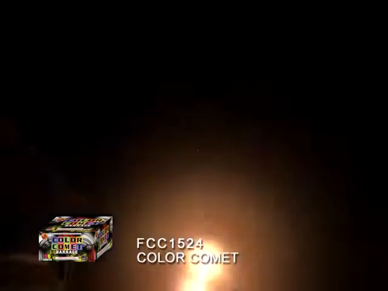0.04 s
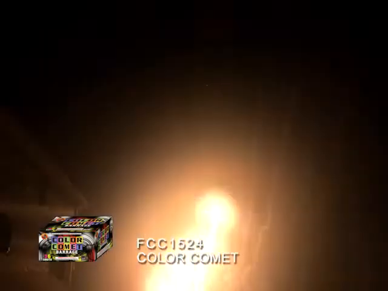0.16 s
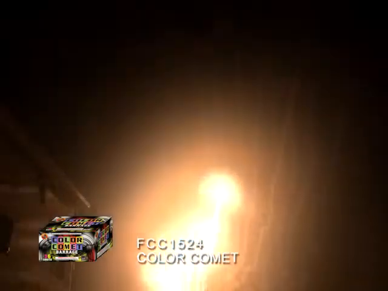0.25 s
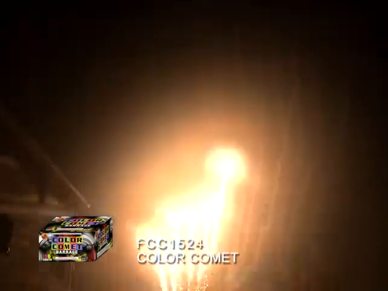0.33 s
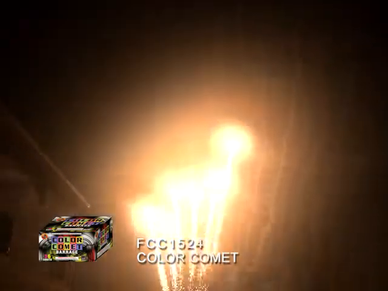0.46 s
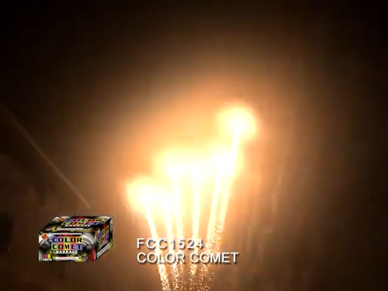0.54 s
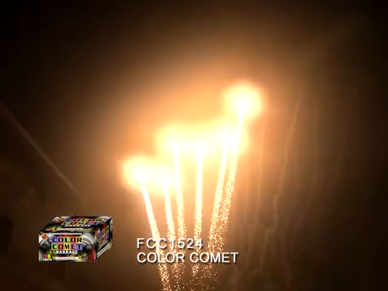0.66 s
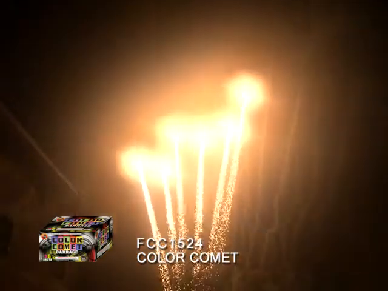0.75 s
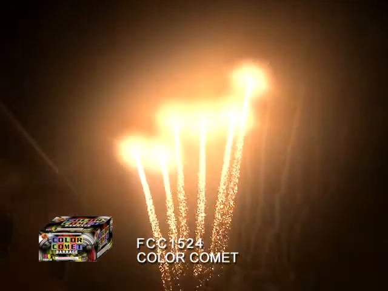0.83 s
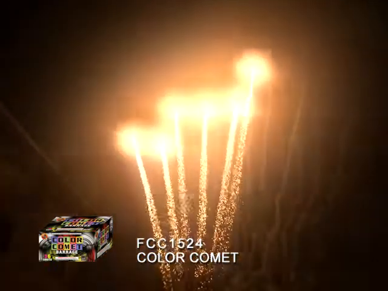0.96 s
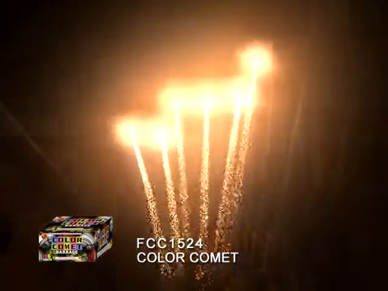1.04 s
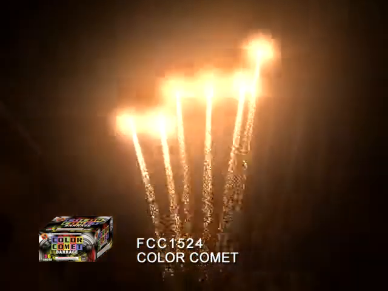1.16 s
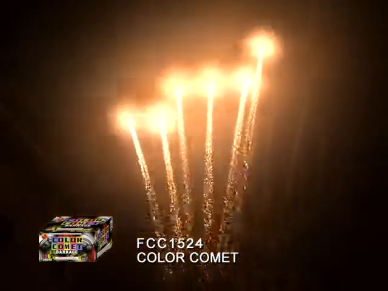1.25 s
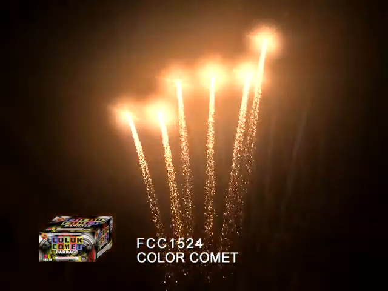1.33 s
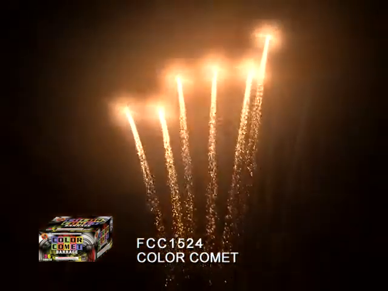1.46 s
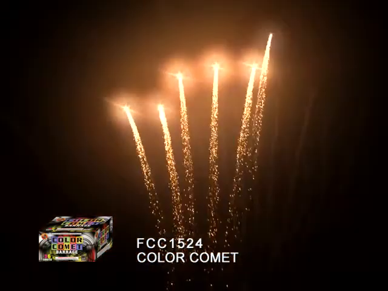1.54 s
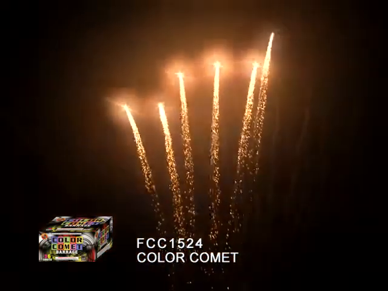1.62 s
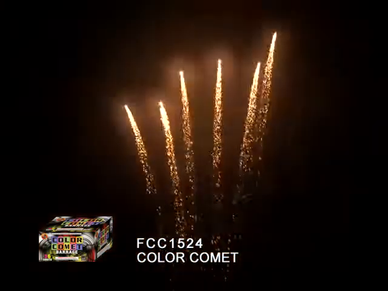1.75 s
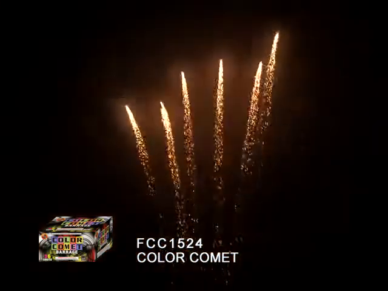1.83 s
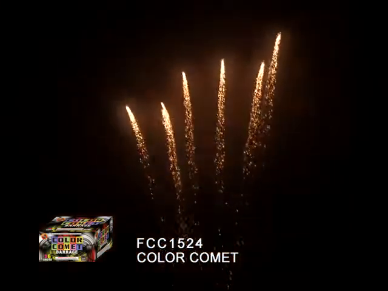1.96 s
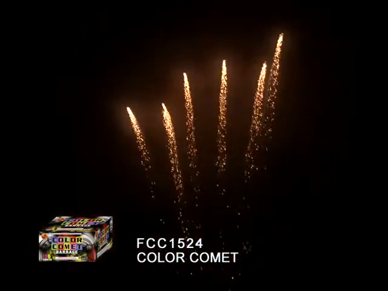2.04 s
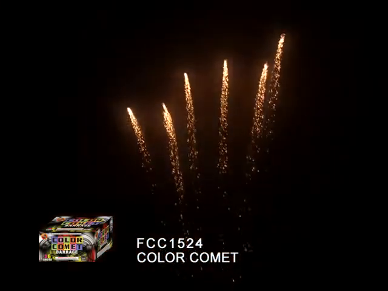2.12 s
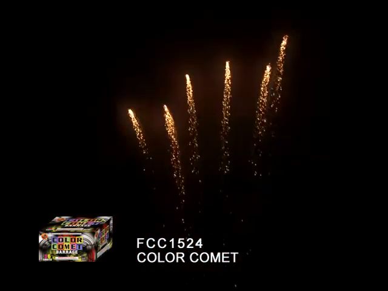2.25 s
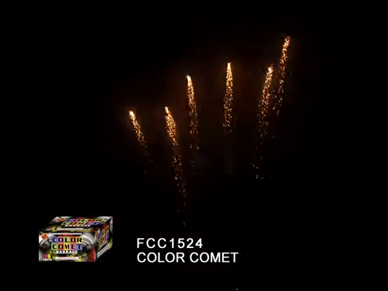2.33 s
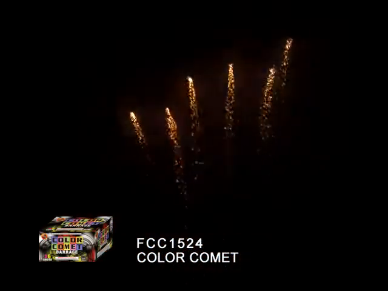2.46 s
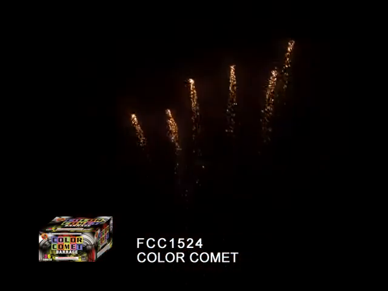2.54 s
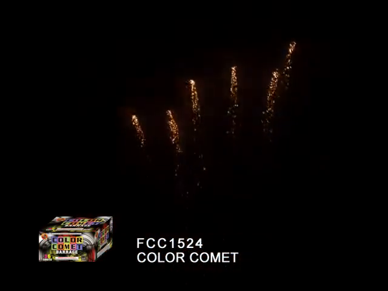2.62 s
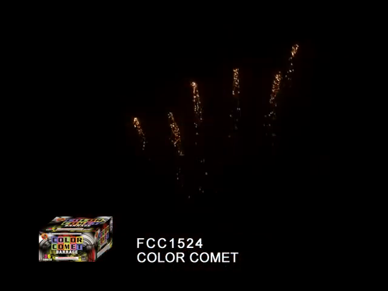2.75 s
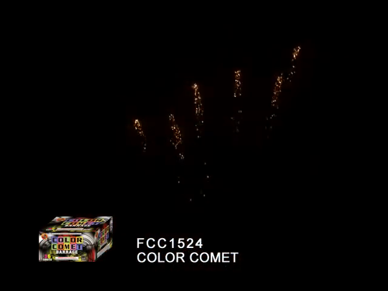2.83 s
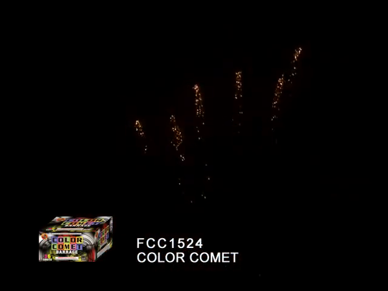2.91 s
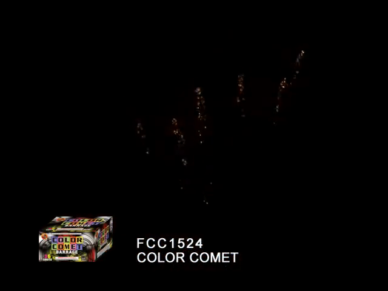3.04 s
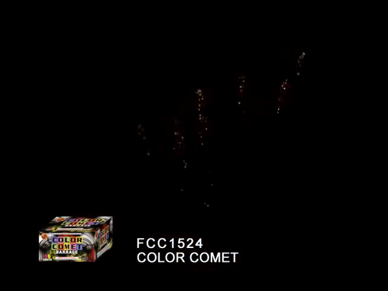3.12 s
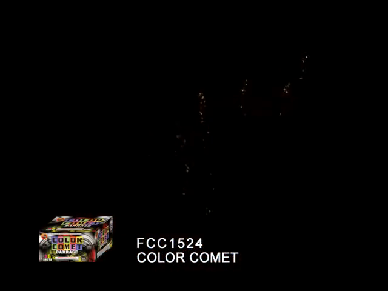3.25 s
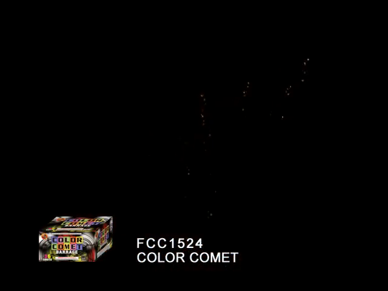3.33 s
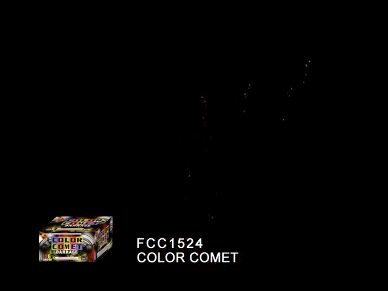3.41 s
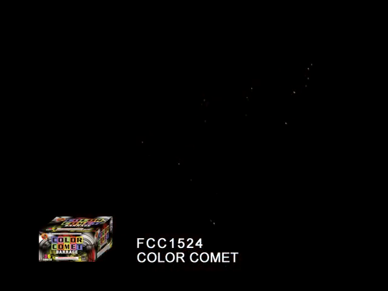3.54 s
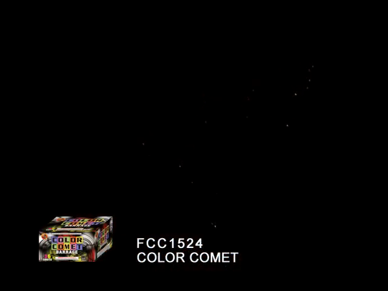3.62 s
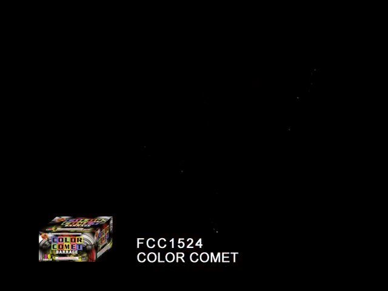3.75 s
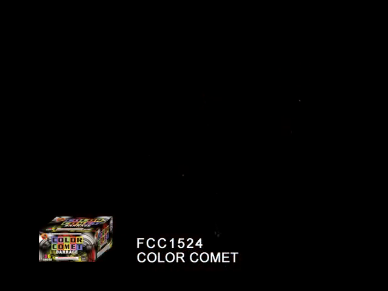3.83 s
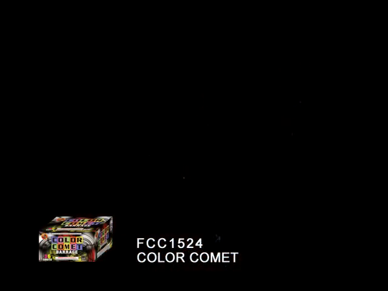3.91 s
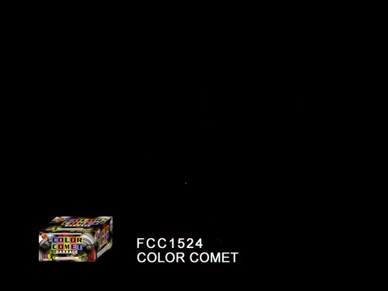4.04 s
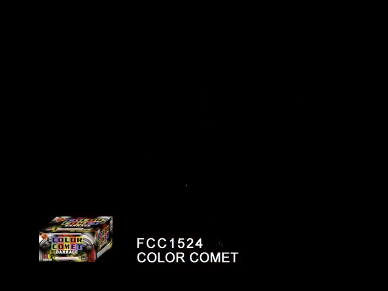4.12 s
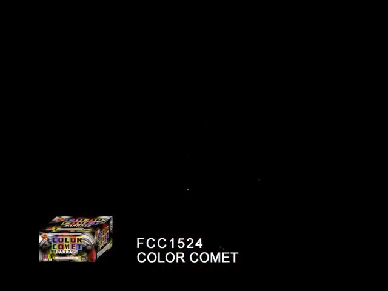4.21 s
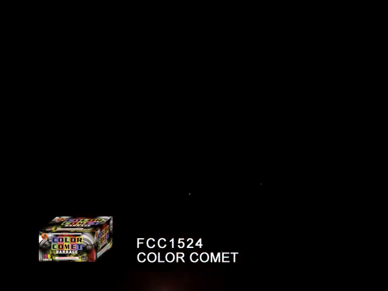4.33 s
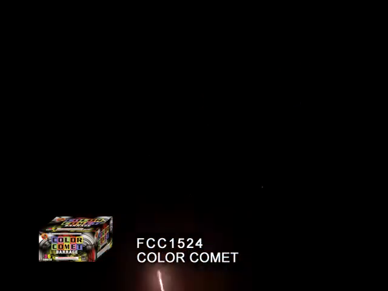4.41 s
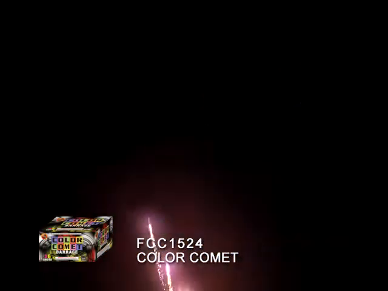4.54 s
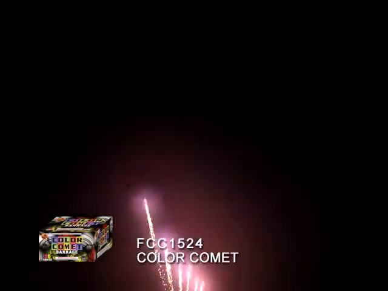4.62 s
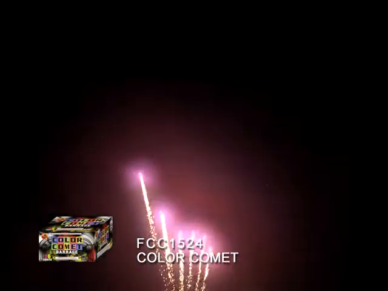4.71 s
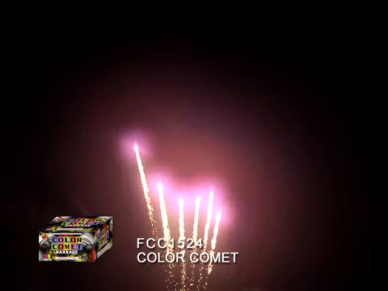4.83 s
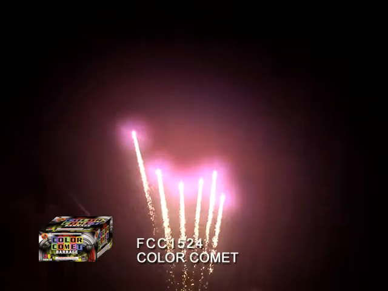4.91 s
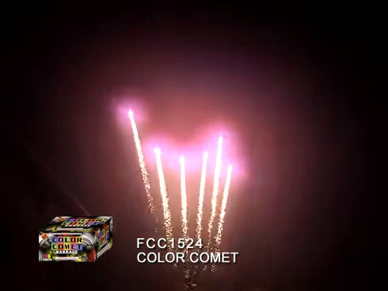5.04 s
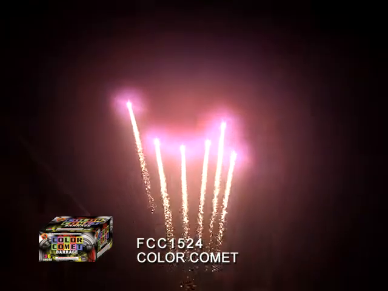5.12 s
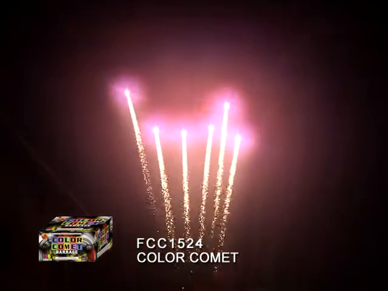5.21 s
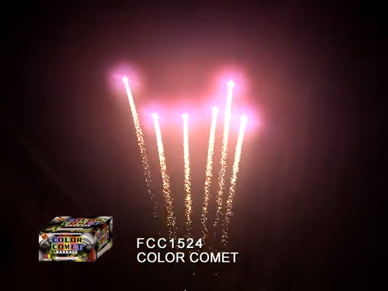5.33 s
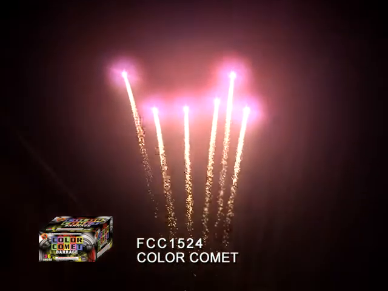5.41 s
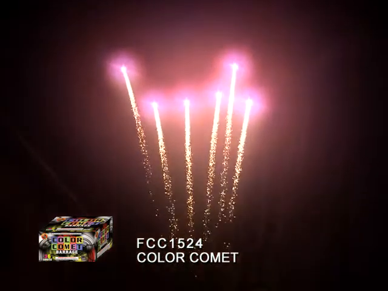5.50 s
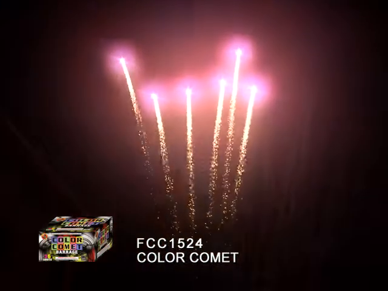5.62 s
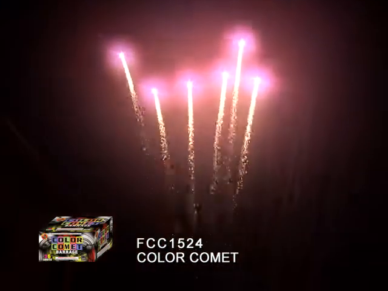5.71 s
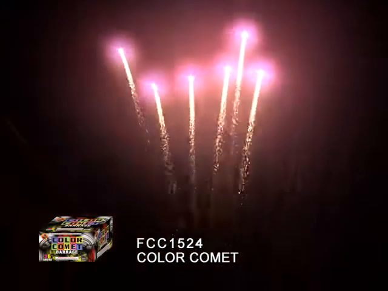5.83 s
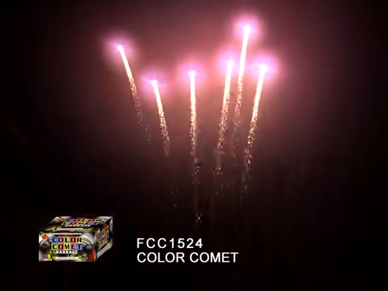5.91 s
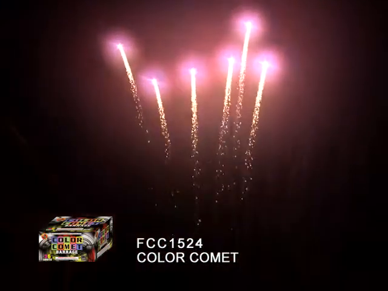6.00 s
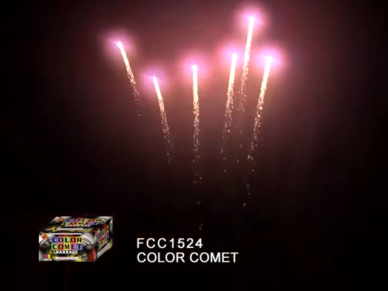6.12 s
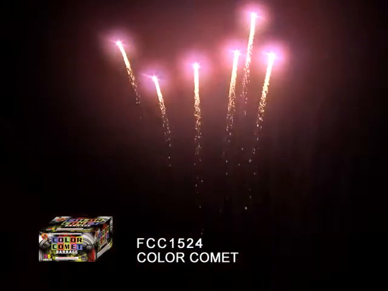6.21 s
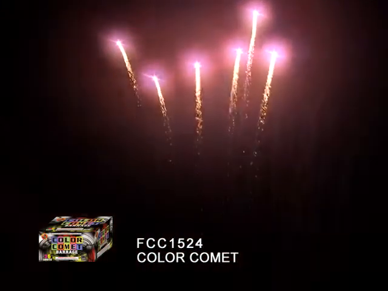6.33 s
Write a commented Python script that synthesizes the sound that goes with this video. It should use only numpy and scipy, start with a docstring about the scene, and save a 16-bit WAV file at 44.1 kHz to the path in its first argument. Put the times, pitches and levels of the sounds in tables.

```python
"""A fuse spits, then six quick booms: a fireworks cake some ten metres off in a yard at night, firing
the first of two volleys, close enough to overload the microphone. Each lift charge booms round the yard
and slaps back from a far wall; its comet hisses, fading as it climbs, and burns out. Between volleys
the fuse fizzes and spits while cars pass far off. The microphone is on the left channel only;
the idle right channel carries faint hiss and soft electrical thumps."""
import sys
import numpy as np
from scipy import signal
from scipy.io import wavfile

SR = 44100
rng = np.random.default_rng(int(sys.argv[2]) if len(sys.argv) > 2 else 0)


def to_wav(sig):
    """Store sig (one row per channel, or 1-D mono) as 16-bit WAV at the path in sys.argv[1].

    Samples outside -1..1 are clipped; the rate is SR.
    """
    pcm = np.clip(np.atleast_2d(sig), -1, 1) * 32767
    pcm = np.round(pcm).astype(np.int16)
    wavfile.write(sys.argv[1], SR, pcm.T)  # frames by channels


N = 280520
TIME = np.arange(N) / SR
GRID = np.fft.rfftfreq(8192, 1 / SR)  # frequencies at which filter shapes are drawn [Hz]

# lift charges, one comet each:
# (time [s], blast level [dB], tube boom [Hz], wall echo level [dB], wall echo pitch [Hz])
LIFT_CHARGES = [(0.2009, 6, 348, -6, 1420), (0.248, 2, 344, -3, 2470), (0.312, 4, 302, -5, 2600),
                (0.335, -3.5, 330, -11.5, 1600), (0.378, 3.5, 302, -5, 1650), (0.408, 4.5, 268, -5.5, 2580),
                (4.6185, 5, 1030, -6.5, 1400), (4.686, 4.5, 600, -3.5, 1380), (4.759, 3, 480, -4.5, 1380),
                (4.781, 1, 370, -5.5, 2100), (4.815, 1.5, 517, -9, 1380), (4.834, 3.5, 615, -11, 1380)]
# hiss of burning comets and fuse: (frequency [Hz], relative level [dB])
BURN_SPECTRUM = [(150, -14), (500, 3.5), (1300, 5), (2500, 1.5), (4500, -1.5), (6800, 0), (8500, -8),
                 (11000, -14.5), (13000, -22), (15500, -30)]


def amp(db):
    """Decibels to gain."""
    return 10 ** (np.asarray(db) / 20)


def unit_rms(x):
    """Scales to rms 1."""
    return x / np.sqrt(np.mean(x ** 2) + 1e-20)


def curve(points, hz=GRID):
    """Reads a table on a logarithmic frequency axis."""
    f, value = np.transpose(points)
    return np.interp(np.log(hz + 1), np.log(f + 1), value)


def bells(rows):
    """Sum of bell-shaped peaks and dips, in dB."""
    return sum(db * np.exp(-2 * ((GRID - hz) / width) ** 2) for hz, width, db in rows)


def add(mix, s, sound):
    """Mixes a sound in at time s."""
    part = mix[max(round(s * SR), 0):][:len(sound)]
    part += sound[:len(part)]


def colour(x, db):
    """Minimum-phase filter with the given dB shape; white noise keeps its power."""
    log_gain = np.log(amp(np.concatenate([db, db[-2:0:-1]])))
    response = np.exp(np.conj(signal.hilbert(log_gain)))
    taps = np.fft.ifft(response).real[:len(db)]
    return signal.oaconvolve(x, taps / np.linalg.norm(taps))[:len(x)]


def drift(rate_hz, size=2000):
    """Slow random wander of rms 1."""
    return unit_rms(np.interp(TIME * rate_hz, np.arange(size), rng.standard_normal(size)))


def reflections(t60_table, size=SR):
    """Dense random reflections, each band dying at its own speed."""
    hz, t, spectra = signal.stft(rng.standard_normal(size), SR, nperseg=256)
    fade = np.exp(-np.log(1000) * t / curve(t60_table, hz)[:, None])
    return signal.istft(spectra * fade, SR)[1][:size]


def burst(t60):
    """A puff of noise that starts at once and dies away."""
    return rng.standard_normal(SR) * np.exp(-np.log(1000) * TIME[:SR] / t60)


def idle_channel(hiss_db=-76, pulse_s=0.02, edge_s=0.0077, droops_hz=(15, 2.5)):
    """Faint circuit hiss, and flat voltage pulses that the coupling capacitors turn into thumps."""
    # voltage pulses ahead of the capacitors: (time [s], height [dB])
    pulses = [(1.6714, -26.5), (2.3528, -28), (2.8928, -28), (4.3325, -28)]
    voltage = np.zeros(N)
    for s, db in pulses:
        rise = np.clip((TIME - s) / edge_s, 0, 1)
        fall = np.clip((TIME - s - pulse_s) / edge_s, 0, 1)
        voltage += amp(db) * (rise - fall)
    for hz in droops_hz:
        voltage = signal.lfilter(*signal.butter(1, hz, "high", fs=SR), voltage)
    return voltage + amp(hiss_db) * rng.standard_normal(N)


def night_air(air_db=-42, flutter_db=0.5, wander_rad=1):
    """Still air over the yard, and the wavering hum of a distant machine."""
    # the air: (frequency [Hz], relative level [dB])
    air_spectrum = [(15, -24), (25, -17.5), (139, -7.5), (213, -3), (271, -4.5), (450, -12), (529, -11),
                    (573, -6.5), (978, -14.5), (1060, -9.5), (1240, -9), (1390, -9.5), (2370, -20.5),
                    (12800, -43.5), (15000, -76)]
    # tones of the machine: (frequency [Hz], rms level [dB])
    hum_tones = [(58.3, -79), (117.2, -54), (175.6, -55), (218.3, -52.5), (401.8, -61.5)]
    air = amp(air_db + flutter_db * drift(16)) * colour(rng.standard_normal(N), curve(air_spectrum))
    hum = sum(amp(db) * np.sqrt(2) * np.sin(2 * np.pi * hz * TIME + wander_rad * drift(19))
              for hz, db in hum_tones)
    return air + hum


def far_traffic(road_db=-46.5, doppler_share=0.008, flutter_db=3):
    """A far road roars steadily; each car swells and fades, its tyre whine sinking as it passes."""
    # cars: (time when nearest [s], swell [s], whine [Hz], pitch wander [share], whine [dB], roar [dB])
    cars = [(2.55, .5, 1101, 0.0049, -43, -57), (3.85, 0.26, 1071, .02, -43, -42.5),
            (4.5, .15, 1043, .008, -43.5, -50)]
    # road roar as it reaches the yard: (frequency [Hz], relative level [dB])
    roar_spectrum = [(300, -26), (700, -12), (1050, -5.5), (1600, -11.5), (3000, -22.5), (8000, -64)]
    roar, whine = amp(road_db) * rng.standard_normal(N), np.zeros(N)
    for s, swell_s, hz, wander, whine_db, roar_db in cars:
        along = (TIME - s) / swell_s
        swell = 1 / (1 + along ** 2)
        pitch = hz * (1 - doppler_share * along / np.hypot(1, along) + wander * drift(18))
        tone = np.sin(2 * np.pi * np.cumsum(pitch) / SR)
        whine += swell * amp(whine_db + flutter_db * drift(16)) * tone
        roar += swell * amp(roar_db) * rng.standard_normal(N)
    return whine + colour(roar, curve(roar_spectrum))


def fuse(fizz_db=-59.5, flare_s=0.0077):
    """The fuse fizzes and spits from tube to tube; the yard holds the middle longer than the treble."""
    # spits of the fuse: (time [s], level [dB], t60 at 5 kHz [s])
    spits = [(0.11, -47, 0.77), (1.81, -43, 0.17), (2.195, -37, 0.2), (2.38, -43, 0.49), (2.403, -34, 0.69),
             (2.969, -34.5, 1), (3.521, -45, 0.76), (3.83, -58, .3), (4.123, -44.5, 1), (4.4, -50.5, 0.23)]
    # their colour: (frequency [Hz], relative level [dB])
    spit_spectrum = [(200, -20), (600, 3), (1400, 1), (1850, -2), (2200, -3), (3100, 0.5), (4500, -9),
                     (6600, -8), (8500, -16.5), (14000, -34)]
    # resonances of the fuse channel: (frequency [Hz], width [Hz], gain [dB])
    channel_rings = [(1820, 90, 12.5), (3170, 980, 2), (4820, 440, 10), (6500, 400, 4.5)]
    spitting = np.zeros(N)
    flare = 1 - np.exp(-TIME[:SR] / flare_s)
    for s, db, t60 in spits:
        decay = [(1500, 1.34 * t60), (5000, t60), (12000, 0.88 * t60)]
        add(spitting, s, amp(db) * flare * reflections(decay))
    fizz = amp(fizz_db) * colour(rng.standard_normal(N), curve(BURN_SPECTRUM))
    return fizz + colour(spitting, curve(spit_spectrum) + bells(channel_rings))


def flight(launch_s, distance_m=10.63, climb_m_per_s=23, ignite_s=0.05, burn_s=1.54, fade_db_per_s=22.5):
    """Gain of one comet: it ignites, fades as it climbs away from the microphone, and burns out."""
    age = np.maximum(TIME - launch_s, 0)
    ignition = np.minimum(age / ignite_s, 1)
    nearness = distance_m / np.hypot(distance_m, climb_m_per_s * age)
    burnout = amp(-fade_db_per_s * np.maximum(age - burn_s, 0))
    return ignition * nearness * burnout


def comets(hiss_db=-30.5, flutter_db=1.2, sparks_per_s=600, spark_db=-13):
    """Burning stars overhead hiss unevenly and shed tiny crackling sparks; their powers add."""
    sparks = (rng.random(N) < sparks_per_s / SR) * rng.standard_normal(N)
    flame = rng.standard_normal(N) + amp(spark_db) * unit_rms(sparks)
    aloft = np.sqrt(sum(flight(s) ** 2 for s, *_ in LIFT_CHARGES))
    return aloft * amp(hiss_db + flutter_db * drift(20)) * colour(flame, curve(BURN_SPECTRUM))


def snaps(t60=0.035, rolloff_hz=4400, muzzle_db=-15, steepening=2.04):
    """Bright snaps: one at each tube's mouth, far louder for a strong charge, and a few among echoes."""
    # snaps among the echoes: (time [s], level [dB])
    late_snaps = [(0.575, -13), (0.670, -7), (5.031, -26), (5.094, -17)]
    out = np.zeros(N)
    for s, db in late_snaps:
        add(out, s, amp(db) * burst(t60))
    for s, db, *_ in LIFT_CHARGES:
        add(out, s, amp(muzzle_db + steepening * db) * burst(t60))
    return colour(out, -20 * np.log10(1 + (GRID / rolloff_hz) ** 2))


def volleys(crack_db=-3, wall_delay_s=0.265, second_slap_db=-18, roll_db=-16.5, roll_rise_s=0.065):
    """Each charge cracks, fills the yard, bounces off the far wall twice and rolls away."""
    # a blast close by in the yard: (frequency [Hz], relative level [dB])
    near_spectrum = [(25, -25), (60, -23), (120, -5.5), (220, -7.5), (350, -1), (520, 1.5), (760, -4),
                     (1100, 0), (1650, -1.5), (2400, -8), (4400, -14), (8000, -24), (15000, -39.5)]
    # what comes back from far away: (frequency [Hz], relative level [dB])
    far_spectrum = [(25, -33), (55, -37), (90, -8), (160, -8.5), (260, -5.5), (480, -0.5), (780, -5.5),
                    (1100, 1), (1650, -2.5), (2300, -6), (3100, -9), (6500, -22.5), (14000, -49)]
    # resonances of the tubes and the yard: (frequency [Hz], width [Hz], gain [dB])
    resonances = [(136.4, 14.6, 7), (209.3, 15, 8), (360, 10.3, 8), (477.4, 50, 5), (308, 24, 4),
                  (596.5, 10, 6), (954.4, 20, 6), (1379, 39, 4.5), (1640, 30, 6)]
    # decay of the yard: (frequency [Hz], t60 [s])
    yard_decay = [(100, 0.5), (400, 0.39), (1500, 0.42), (5000, 0.55), (12000, 0.35)]
    # decay of the roll through the neighbourhood: (frequency [Hz], t60 [s])
    roll_decay = [(100, 2.04), (250, 1.66), (500, 2.16), (1500, 2.01), (4000, 1.98), (10000, 0.66)]
    near, far = np.zeros(N), np.zeros(N)
    # the roll builds up as the sound reaches more houses and trees
    build_up = 1 - np.exp(-TIME[:2 * SR] / roll_rise_s)
    for s, db, boom_hz, echo_db, echo_hz in LIFT_CHARGES:
        boom = colour(reflections(yard_decay), bells([(boom_hz, 170, 6)]))
        add(near, s, amp(db) * boom)
        add(far, s, amp(db + crack_db) * burst(t60=0.026))
        slap = amp(echo_db) * colour(burst(t60=0.37), bells([(echo_hz, 240, 7)]))
        add(far, s + wall_delay_s, slap)
        add(far, s + 2 * wall_delay_s, amp(second_slap_db) * slap)
        roll = build_up * reflections(roll_decay, size=len(build_up))
        add(far, s, amp(db + roll_db) * roll)
    ring_db = bells(resonances)
    return colour(near, curve(near_spectrum) + ring_db) + colour(far, curve(far_spectrum) + ring_db)


def scene():
    """Everything reaches one microphone in the yard, on the left channel."""
    left = volleys() + snaps() + comets() + fuse() + night_air() + far_traffic()
    return np.array([left, np.zeros(N)])


def record(dry, ceiling=0.94, knee=6, low_cut_hz=50, high_cut_hz=15750):
    """Housing colour, an overloaded preamplifier that flattens the blasts, then the band limits."""
    # peaks and dips of the microphone housing: (frequency [Hz], width [Hz], gain [dB])
    housing = [(3150, 300, 3.5), (3550, 515, -6.5), (4445, 320, 4), (4770, 610, -4), (9340, 790, -3.5)]
    drive = signal.resample_poly(colour(dry[0], bells(housing)), 2, 1)  # oversampled against aliasing
    flattened = drive / (1 + abs(drive / ceiling) ** knee) ** (1 / knee)
    left = signal.resample_poly(flattened, 1, 2)
    left = signal.lfilter(*signal.butter(1, low_cut_hz, "high", fs=SR), left)
    both = np.array([left, dry[1] + idle_channel()])
    low_pass = signal.firwin(511, high_cut_hz, window=("kaiser", 9), fs=SR)
    return signal.oaconvolve(both, low_pass[None], "same", axes=1)


dry = scene()
out = record(dry)
to_wav(out)
```